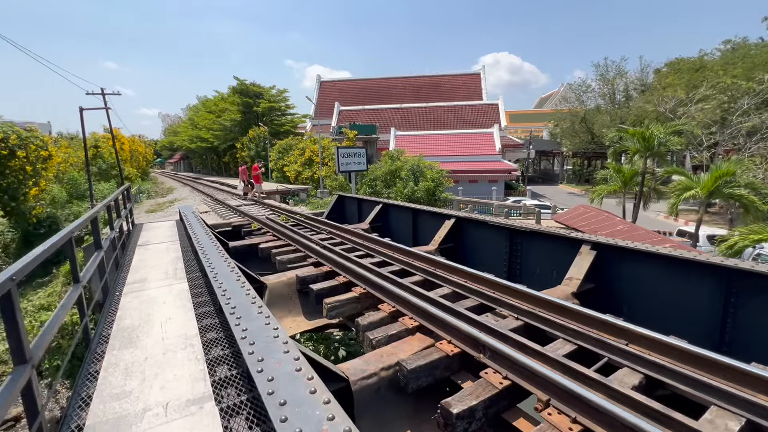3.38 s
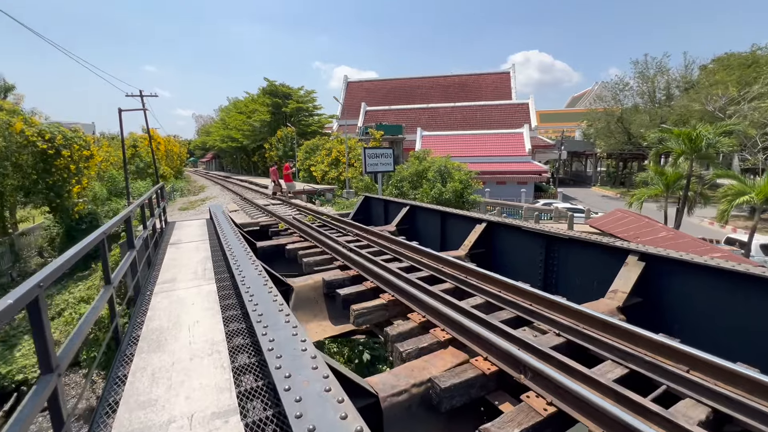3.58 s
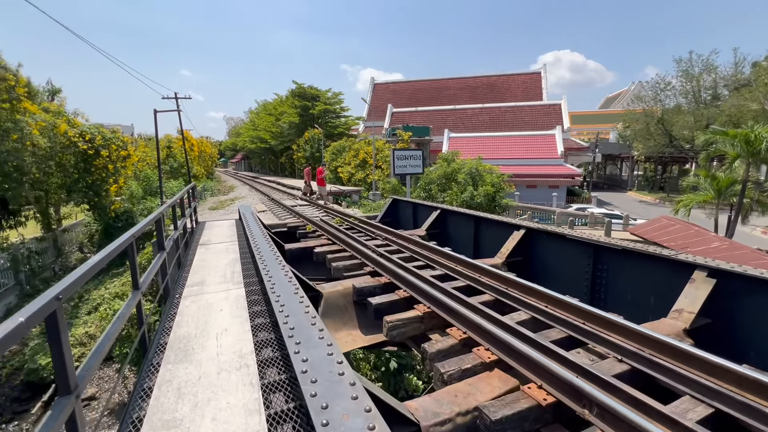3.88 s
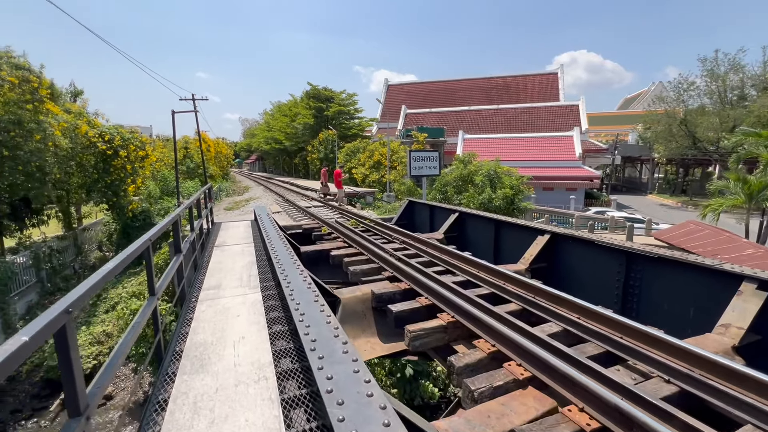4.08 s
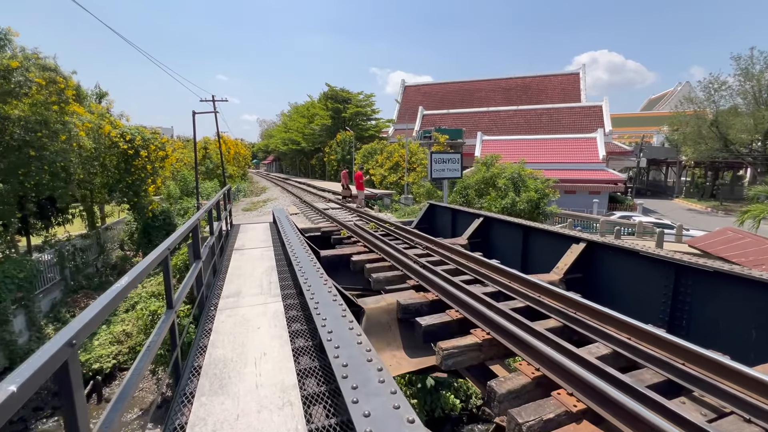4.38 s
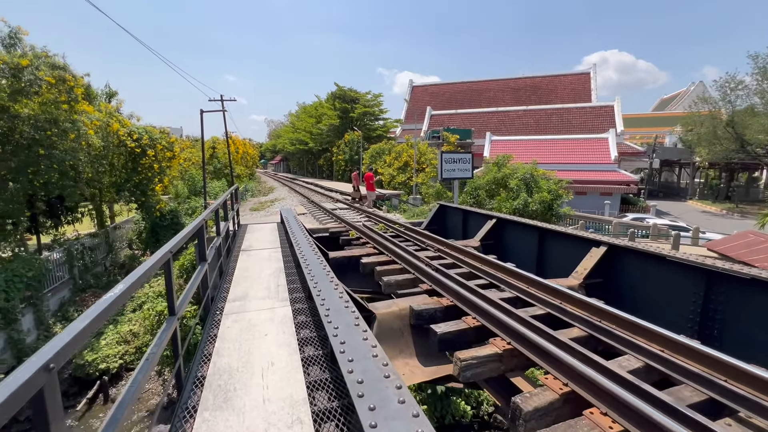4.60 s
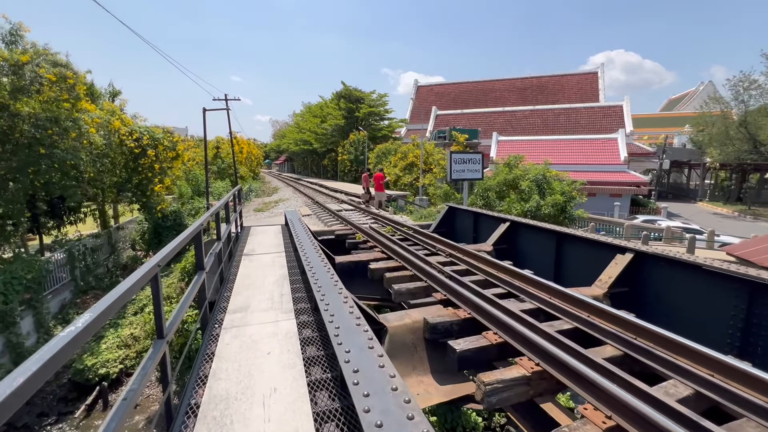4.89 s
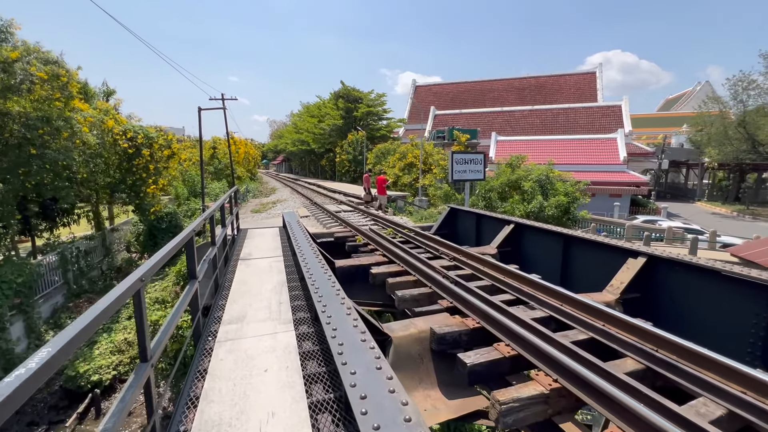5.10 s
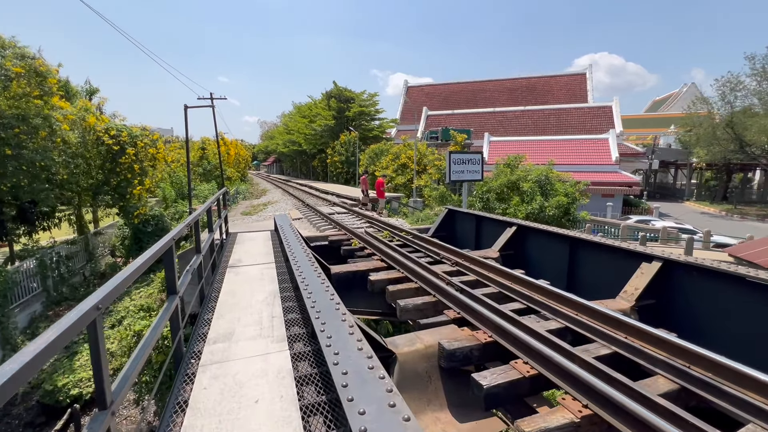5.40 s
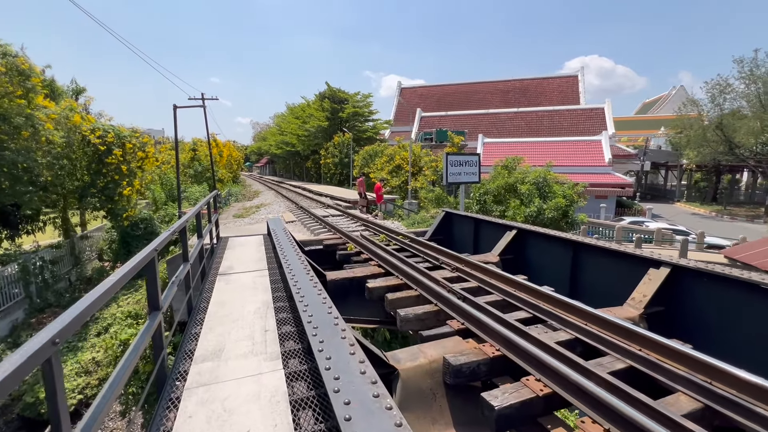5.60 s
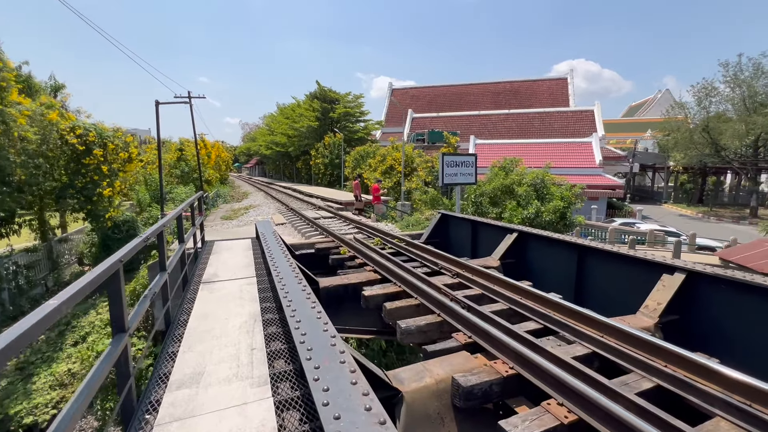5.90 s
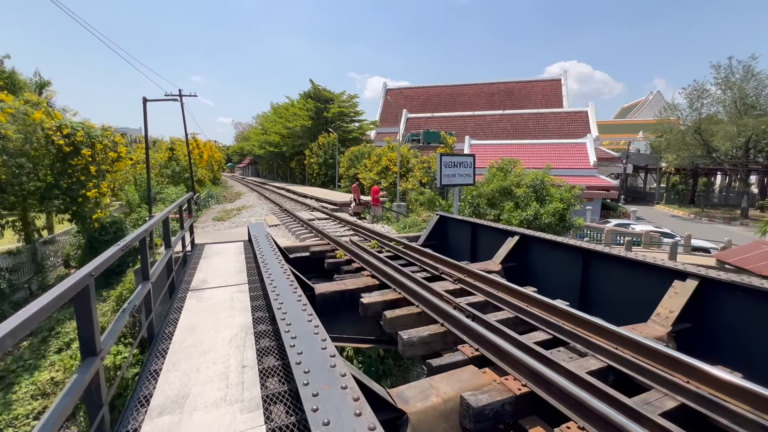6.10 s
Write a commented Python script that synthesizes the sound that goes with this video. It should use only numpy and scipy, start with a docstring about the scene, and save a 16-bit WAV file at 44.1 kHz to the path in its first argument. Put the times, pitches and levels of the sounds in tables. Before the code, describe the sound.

Loud raspy open-exhaust boat engine tears away from beneath a bridge, spray pattering and wake hissing behind, its steady low drone dwindling over six seconds.

```python
"""Canal under a steel railway bridge: a longtail boat has just shot through and runs away to the right.
Its open exhaust drones in partials of the engine cycle and barks in bursts of low noise once per cycle.
The bare engine clatters and rings as modulated noise, and the pipe's mouth rasps at each firing.
Spray thrown up by the propeller rains back as clumped noise with splashes; the wake is left hissing."""
import sys
import numpy as np
from scipy import signal
from scipy.fft import rfft, irfft
from scipy.io import wavfile
from scipy.ndimage import map_coordinates

SR = 44100
rng = np.random.default_rng(int(sys.argv[2]) if len(sys.argv) > 2 else 0)


def master(y):
    """Save y as 16-bit WAV."""
    cut = np.clip(np.atleast_2d(y).T, -1, 1)
    pcm = np.round(cut * 32767)  # scale
    wavfile.write(sys.argv[1], SR, pcm.astype(np.int16))


N = 275625
TIME = np.arange(N) / SR
FREQS = np.maximum(np.fft.rfftfreq(N, 1 / SR), 1)
NEAREST_S, NEAREST_M, BOAT_M_PER_S = 0.12, 4.96, 7.28
# Common swell of the weaker partials. Each row: time in seconds, swell in dB.
WEAK_SWELL = [(0, 1.5), (1, -3.5), (1.9, 4), (3, 3.5), (3.8, 2), (4.5, -9), (6.25, -1)]


def from_db(db):
    """Decibels to gain."""
    return 10 ** (np.asarray(db) / 20)


def rms_one(x):
    """Scale to unit power."""
    return x / np.sqrt(np.mean(x ** 2) + 1e-20)


def in_time(rows):
    """Each column of a curve table, interpolated at every sample."""
    s, *columns = np.transpose(rows)
    return [np.interp(TIME, s, c) for c in columns]


def in_hz(points):
    """A spectrum table, interpolated over log frequency."""
    hz, value = np.transpose(points)
    return np.interp(np.log(FREQS), np.log(hz), value)


def drift(corner_hz):
    """Random wander of unit RMS: white noise, low-passed."""
    return rms_one(irfft(rfft(rng.standard_normal(N)) / (1 + (FREQS / corner_hz) ** 2), N))


def split_gain(left_minus_right_db):
    """Left and right gains, half the difference each way."""
    return from_db(np.array([[1], [-1]]) / 2 * left_minus_right_db)


def noise(spectrum, alike, modes=()):
    """Stereo turbulence with a colour and resonances, partly alike at the two microphone ports."""
    level_db = in_hz(spectrum)
    for hz, width_hz, lift_db in modes:
        level_db = level_db + lift_db / (1 + (2 * (FREQS - hz) / width_hz) ** 2)
    white = rfft(rng.standard_normal((2, N)))
    mid, side = rms_one(irfft(from_db(level_db) * white, N))
    alike = np.clip(alike, -1, 1)
    return np.sqrt((1 + alike) / 2) * mid + np.sqrt((1 - alike) / 2) * side * [[1], [-1]]


def throb(cycles, depth_db, second_db, delay_cycles):
    """A swell once per engine cycle, with a smaller one at each firing."""
    angle = 2 * np.pi * (cycles - delay_cycles)
    return rms_one(from_db(depth_db * np.cos(angle) + second_db * np.cos(2 * angle)))


def distance_m():
    """How far off the boat is on its straight course at steady speed."""
    return np.hypot(NEAREST_M, BOAT_M_PER_S * (TIME - NEAREST_S))


def spreading_db(echo_db):
    """Direct sound falls as one over distance onto a steady bank echo; dB against the nearest direct sound."""
    return 10 * np.log10((NEAREST_M / distance_m()) ** 2 + from_db(echo_db) ** 2)


def off_the_water(x, share):
    """The water mirrors the sound; the detour shrinks with distance, so a comb of resonances sweeps upward."""
    bridge_height_m, engine_height_m = 5, 1.28
    ripple_cut_hz, sound_m_per_s = 1000, 343  # ripples mirror only the lower range
    direct_m = distance_m()
    detour_m = np.sqrt(direct_m ** 2 + 4 * bridge_height_m * engine_height_m) - direct_m
    read_at = np.arange(N) - detour_m / sound_m_per_s * SR
    mirrored = np.array([map_coordinates(port, [read_at], order=1, mode="nearest") for port in x])
    pole = np.exp(-2 * np.pi * ripple_cut_hz / SR)
    dulled = signal.lfilter([1 - pole], [1, -pole], mirrored)
    return (x + share * dulled) / np.hypot(1, share)


def drone(cycles, flutter_db):
    """Unequal firings give clean partials on the cycle rate; they fade by a share of the spreading loss."""
    # Swells of orders 1 to 4 as bank echoes interfere. Each row: time in seconds, swell in dB.
    cycle_swell = [(0, -1), (.75, 4), (1.4, 1), (1.7, 4), (2.3, 3), (3.3, 3), (4.1, 2), (4.8, -2),
                   (6.25, 2)]
    second_swell = [(0.0, -5.5), (0.4, 0.5), (1.21, -3), (1.51, 3), (1.92, -1), (2.42, 3.5), (3.02, -1),
                    (3.93, -1), (4.23, 3.0), (5.04, -1.5), (5.24, -6), (5.65, 1.5), (5.85, -1), (6.25, 0.5)]
    third_swell = [(0, -7), (.55, 3.5), (.72, 4.5), (.97, -9), (1.2, 6.5), (1.45, -14), (2.2, -6),
                   (2.4, -5), (2.62, -12), (3.15, -2), (3.38, 0), (3.65, 4.5), (4.05, 2), (4.4, -8),
                   (4.65, -10), (4.95, -5.5), (5.35, 4), (5.6, -2.5), (6, 5), (6.25, 3)]
    fourth_swell = [(0, -3), (.3, 6), (.55, -1.5), (1, 0), (1.22, -7), (1.4, 2), (1.65, 5), (2.02, -7),
                    (2.25, 0), (2.8, -10), (3.05, -0.5), (3.25, -7), (3.6, -1.5), (3.98, -1), (4.48, -7.5),
                    (4.8, 1.5), (5.3, 1), (5.75, -0.5), (5.95, -1.5), (6.25, 4)]
    # Weaker partials. Each row: cycle order, level in dB relative to weak_db.
    overtones = [(5, -43), (6, -31.5), (7, -34.5), (9, -22.5), (11, -34.5), (12, -31.5)]
    weak_db = -17 + in_time(WEAK_SWELL)[0]
    fade_db = 0.5 * spreading_db(echo_db=-40)  # the canal channels the low partials
    strong = [(1, -29.5, cycle_swell), (2, -17, second_swell), (3, -22, third_swell), (4, -24, fourth_swell)]
    partials = [(order, db + in_time(swell)[0]) for order, db, swell in strong]
    partials += [(order, db + weak_db) for order, db in overtones]
    total = 0
    for order, db in partials:
        wander_db = flutter_db * np.sqrt(order) * drift(2.1)
        phase = np.pi * (order == 1)  # the lowest swings against the rest
        tone = np.cos(2 * np.pi * order * cycles + phase)
        total = total + from_db(db + fade_db + wander_db) * tone
    return -np.sqrt(2) * total


def exhaust(cycles, alike):
    """Puffs leave the pipe as bursts of low turbulence, blurred by echoes with distance, over a rumble."""
    # Colours of bark and rumble. Each row: frequency in Hz, relative dB per Hz.
    bark_spectrum = [(70, -66), (115, 6), (150, 6.5), (210, 5.5), (280, 0.5), (320, -2), (385, -6),
                     (430, -8.5), (540, -13), (650, -15), (800, -12), (2000, -54)]
    rumble_spectrum = [(20, -45), (35, -40), (41, -11), (58, -4.5), (100, 0), (145, -12.5), (185, -15.5),
                       (225, -25), (270, -18.5), (315, -28.5), (500, -60)]
    # Resonances of the exhaust pipe. Each row: frequency in Hz, width in Hz, lift in dB.
    pipe_modes = [(277, 12.5, 5), (380, 47, 3)]
    swell_db = 0.36 * in_time(WEAK_SWELL)[0]
    base_db = -19 + 0.9 * spreading_db(echo_db=-24) + swell_db
    bark_db = base_db + 1.3
    rumble_db = -18.3 + 0.43 * base_db  # fades less, so carries farther
    clear = np.sqrt(NEAREST_M / distance_m())
    puffs = throb(cycles, depth_db=2 * clear, second_db=0.7 * clear, delay_cycles=0.72)
    bark = from_db(bark_db) * noise(bark_spectrum, alike, pipe_modes) * puffs
    rumble = from_db(rumble_db) * noise(rumble_spectrum, alike)
    return off_the_water(bark, share=0.17) + rumble


def thuds():
    """Short hollow booms: sines under brief bell-shaped swells."""
    # Each row: centre in seconds, pitch in Hz, envelope peak in dB, half-length to 1/e in seconds.
    booms = [(.02, 230, -11, .011), (.112, 260, -13, .009), (.175, 150, -14, .012), (.205, 220, -15, .014),
             (.355, 230, -11, .009), (1.445, 200, -18, .014), (1.532, 230, -9.5, .009),
             (1.551, 260, -12, .008), (1.568, 250, -17.5, .007), (1.97, 145, -20, .022),
             (2.58, 84, -20, .018), (2.97, 280, -26, .03), (3.09, 270, -28, .04), (3.22, 290, -29, .03),
             (3.352, 110, -17, .013), (4.58, 250, -30, .018)]
    total = 0
    for centre_s, hz, peak_db, length_s in booms:
        since_s = TIME - centre_s
        swell = np.exp(-(since_s / length_s) ** 2)
        total = total + from_db(peak_db) * swell * np.sin(2 * np.pi * hz * since_s)
    return total


def clatter(cycles, alike):
    """Valve gear and combustion shake the bare block in time with the cycle and set it ringing."""
    # Colours of the rattle and the hollow ring. Each row: frequency in Hz, relative dB per Hz.
    rattle_spectrum = [(200, 2.5), (420, -3.5), (620, -9.5), (1050, -4.5), (1180, -1), (1370, 1.5),
                       (1700, -9), (2400, -8), (3200, -13.5), (4500, -20), (8000, -40), (16000, -55)]
    ring_spectrum = [(500, -14.5), (740, 2.5), (835, 6.5), (880, 4.5), (950, 5.5), (1040, 5), (1200, -5),
                     (2000, -33)]
    # Ringing of the engine's metal. Each row: frequency in Hz, width in Hz, lift in dB.
    engine_modes = [(512, 14, 4), (1316, 52, 0), (2270, 36, 4.5), (3770, 260, 7)]
    # Swell of the hollow ring as bank echoes interfere. Each row: time in seconds, swell in dB.
    ring_swell = [(0, 1), (.8, 0.5), (1.2, -1), (1.7, 3), (2.5, 2.5), (3.2, -1), (3.9, 0), (4.9, 1),
                  (5.3, 3.5), (5.7, -1), (6.25, 1.5)]
    swell_db, = in_time(ring_swell)
    shake = throb(cycles, depth_db=0.75, second_db=0.4, delay_cycles=0.87) * from_db(0.8 * drift(18))
    rattle_db = -26.5 + 1.083 * spreading_db(echo_db=-9)
    rattle = from_db(rattle_db) * noise(rattle_spectrum, alike, engine_modes)
    ring_db = -31.5 + swell_db + 0.61 * spreading_db(echo_db=-20) + 0.64 * drift(9)
    ring = from_db(ring_db) * (noise(ring_spectrum, alike) + whine())
    return off_the_water((rattle + ring) * shake, share=0.17)


def whine():
    """A thin tone within the ring that wavers slightly in pitch, comes and goes."""
    pitch_hz = 845 * (1 + 0.018 * drift(4.87))
    turns = np.cumsum(pitch_hz) / SR
    return from_db(-6) * drift(7.7) * np.sin(2 * np.pi * turns)


def rasp(cycles, alike):
    """Gas cracks at the pipe's mouth with each firing, strong and weak in turn; heard mainly close by."""
    # Colour of the rasp. Each row: frequency in Hz, relative dB per Hz.
    rasp_spectrum = [(900, -9), (1400, -28), (1900, 0.5), (2400, 3), (3000, -4), (4000, -9), (7000, -13),
                     (12000, -26)]
    # Resonances of the pipe's mouth. Each row: frequency in Hz, width in Hz, lift in dB.
    mouth_modes = [(1320, 71, 6), (1900, 100, 5), (2290, 180, -3), (3760, 100, 1), (3970, 90, 15)]
    lead_cycles, decay_firings, floor = 0.16, 0.2, 0.24  # lead ahead of the drone; floor lasts between cracks
    weaker_db, spread_db = 3.5, 2.8
    facing_s, facing_length_s, facing_lift_db = 0.55, 0.33, 2.5  # pipe faces the bridge just after the pass
    firing, since = np.divmod(2 * (cycles + lead_cycles), 1)
    count = firing.astype(int)
    random_db = spread_db * rng.standard_normal(count.max() + 1)
    strength_db = random_db[count] - weaker_db * (count % 2)
    envelope = np.exp(-since / decay_firings) + floor
    cracks = rms_one(from_db(strength_db + 2 * drift(440)) * envelope)
    facing_db = facing_lift_db * np.exp(-((TIME - facing_s) / facing_length_s) ** 2)
    level_db = -34.5 + facing_db + 1.2 * spreading_db(echo_db=-23)
    return from_db(level_db) * noise(rasp_spectrum, 0.5 * alike, mouth_modes) * cracks


def mingle(x, low_hz, high_hz, count):
    """Reflections from ripples and banks mingle, so each narrow midrange band flutters on its own."""
    flutter_db, flutter_hz = 2.4, 12
    place = (count + 1) * np.log(FREQS / low_hz) / np.log(high_hz / low_hz)
    spectrum, out = rfft(x), x
    for k in range(1, count + 1):
        band = irfft(spectrum * np.clip(1 - abs(place - k), 0, 1), N)
        flutter = rms_one(from_db(flutter_db * drift(flutter_hz)))
        out = out + band * (flutter - 1)
    return out


def spray(offset_db, pan_db):
    """The spray lands all around in clumps of drops, with a few bigger splashes."""
    # Colours of falling spray and fine mist. Each row: frequency in Hz, relative dB per Hz.
    spray_spectrum = [(2000, 9), (5000, -13), (7500, -5.5), (9000, 4.5), (10300, -10), (11700, 5.5),
                      (12700, -3), (14000, -16), (16000, 1.5)]
    mist_spectrum = [(2000, -22), (4500, 1), (6400, -7), (7500, -1), (9000, 5), (10300, -2.5), (11700, 7.5),
                     (14000, -10), (16000, 3)]
    # Falling spray. Each row: time in seconds, level in dB before offset_db and distance.
    spray_fall = [(0.0, -34), (0.07, -36), (0.52, -33), (0.56, -34.5), (1.46, -38.5), (1.92, -38.5),
                  (2.4, -48.5), (3.06, -45.5), (5.66, -53), (6.25, -47)]
    # Stereo width. Each row: frequency in Hz, gain of the side signal in dB.
    spray_width = [(9500, 1), (10500, -10), (16000, 7.5)]
    mist_peak_s, mist_length_s, mist_db = 2.28, 0.47, -32.5
    fall_db, = in_time(spray_fall)
    drops = rms_one(from_db(1.3 * drift(900) + 1.1 * drift(25)))
    shower_db = offset_db + fall_db + 0.26 * spreading_db(echo_db=-28)
    shower = from_db(shower_db) * noise(spray_spectrum, 0) * drops
    mist_swell = np.exp(-((TIME - mist_peak_s) / mist_length_s) ** 2)
    mist = from_db(mist_db) * mist_swell * noise(mist_spectrum, 0) * drops
    left, right = (shower + mist + splashes()) * split_gain(pan_db)
    side = irfft(rfft((left - right) / 2) * from_db(in_hz(spray_width)), N)
    return (left + right) / 2 + side * [[1], [-1]]


def splashes():
    """Splashes, slaps and ticks: short swells of band-limited noise."""
    # Each row: time in seconds, centre in Hz, peak level in dB, half-length in seconds, half-width in octaves.
    hits = [(0.238, 8600, -30, .005, .1), (0.29, 3300, -32, 0.009, .5), (0.313, 3000, -28, 0.011, 0.7),
            (0.433, 3700, -27.5, 0.01, 0.1), (0.434, 8460, -29, 0.0067, 0.07),
            (0.478, 11000, -24, 0.0037, 0.5), (0.482, 5865, -27, 0.0063, 0.018),
            (0.485, 6530, -29, 0.0067, 0.15), (0.498, 11000, -32, 0.0091, 0.28),
            (0.522, 11600, -26, 0.0048, 0.098), (3.342, 770, -34, 0.037, 0.19),
            (3.84, 700, -36, 0.035, 0.08), (3.855, 855, -34, .025, 0.07), (4.815, 13000, -45, 0.004, .4),
            (6.01, 11000, -45, .018, .4)]
    out, white = 0, rfft(rng.standard_normal((2, N)))
    for s, hz, db, length_s, octaves in hits:
        band = rms_one(irfft(white * np.exp(-(np.log2(FREQS / hz) / octaves) ** 2), N))
        out = out + from_db(db) * np.exp(-((TIME - s) / length_s) ** 2) * band
    return out


def water(cycles, alike):
    """The wake hisses as turbulence, throbbing in step with the engine cycle."""
    # Colour of the wake. Each row: frequency in Hz, relative dB per Hz.
    wake_spectrum = [(200, -40), (500, 10), (900, 2.5), (1700, 5.5), (2500, 1.5), (3300, 2), (4300, 2),
                     (5400, 4), (6500, 3.5), (7500, -1.5), (9000, -2.5), (11000, -20), (16000, -40)]
    # Hiss of the wake. Each row: time in seconds, level in dB before the 4.5 dB lift.
    wake_hiss = [(0.0, -35), (0.05, -35), (0.5, -32), (0.52, -34), (0.82, -35.5), (1.93, -38.5),
                 (2.28, -37.5), (2.73, -40), (5.66, -44.5), (6.25, -42.5)]
    hiss_db = in_time(wake_hiss)[0] + 4.5
    churn = throb(cycles, depth_db=0.53, second_db=0.2, delay_cycles=0.89) * from_db(0.76 * drift(18))
    return from_db(hiss_db) * noise(wake_spectrum, 0.24 * alike) * churn


def from_right(x, lag_ms):
    """Sound from the right reaches the left port later."""
    read_at = np.arange(N) - lag_ms * SR / 1000
    return np.array([map_coordinates(x[0], [read_at], order=3, mode="nearest"), x[1]])


def ports(x):
    """Each microphone port has its own colour; the pair's mean power is kept."""
    # Each row: frequency in Hz, left minus right in dB.
    port_balance = [(60, 2.6), (150, 1.3), (330, 2.1), (500, .2), (770, -1.5), (1170, .2), (1800, .5),
                    (2800, 2.0), (4200, 5.6), (6400, 8), (8500, 3), (11000, 0), (15000, 0)]
    gain = split_gain(in_hz(port_balance))
    return irfft(rfft(x) * gain / np.sqrt(np.mean(gain ** 2, axis=0)), N)


def scene():
    """One crankshaft times drone, exhaust, engine and wake; the boat moves right amid falling spray."""
    # Engine speed. Each row: time in seconds, firings per second (two firings make one cycle).
    engine_speed = [(0, 83.2), (.12, 81.6), (.3, 82.7), (.5, 85.4), (.72, 86), (.95, 84.3), (1.12, 84.4),
                    (1.4, 80.7), (1.6, 81.9), (1.8, 85.4), (2, 86.4), (2.25, 84), (2.8, 84.1), (3.28, 85.6),
                    (3.5, 82.8), (3.78, 84.9), (4.35, 84.1), (4.9, 84.7), (5.15, 84.2), (5.28, 81.9),
                    (5.85, 85.2), (6.25, 83.5)]
    # Out from under the bridge into open view. Each row: time in seconds, left port lag in ms,
    # left minus right in dB, left-right likeness of the clatter, likeness of the exhaust.
    boat_path = [(0, .24, .1, .25, .95), (1.5, .26, -.3, .25, .93), (2.2, .36, 0, .45, .85),
                 (3.1, .375, 1, .62, .83), (5, .375, .9, .72, .8), (6.25, .375, -.3, .6, .7)]
    firing_hz, = in_time(engine_speed)
    lag_ms, pan_db, clatter_alike, exhaust_alike = in_time(boat_path)
    cycles = np.cumsum(firing_hz / 2) / SR
    bass = drone(cycles, flutter_db=0.3) + exhaust(cycles, exhaust_alike) + thuds()
    engine = clatter(cycles, clatter_alike) + rasp(cycles, clatter_alike)
    fluttering = mingle(engine, low_hz=604, high_hz=2790, count=19)
    treble = fluttering + water(cycles, clatter_alike)
    bass_lag_ms = 1.81 * lag_ms  # long waves bend round the microphone body and lag more
    boat = from_right(bass, bass_lag_ms) + from_right(treble, lag_ms)
    return ports(boat * split_gain(pan_db)) + spray(offset_db=8.5, pan_db=-1.5)


def record(dry):
    """The lowest rumble and the top are cut steeply."""
    low_cut_hz, cutoff_hz = 36, 15900
    thinned = signal.sosfilt(signal.butter(6, low_cut_hz, "high", fs=SR, output="sos"), dry)
    return signal.sosfilt(signal.ellip(12, 0.1, 90, cutoff_hz, fs=SR, output="sos"), thinned)


dry = scene()
out = record(dry)
master(out)
```